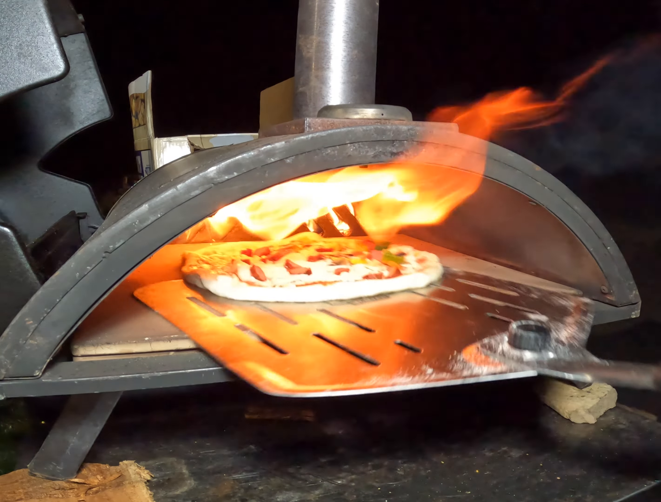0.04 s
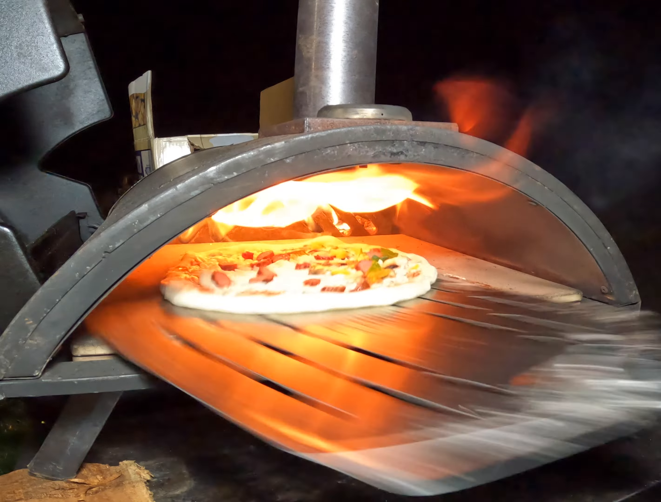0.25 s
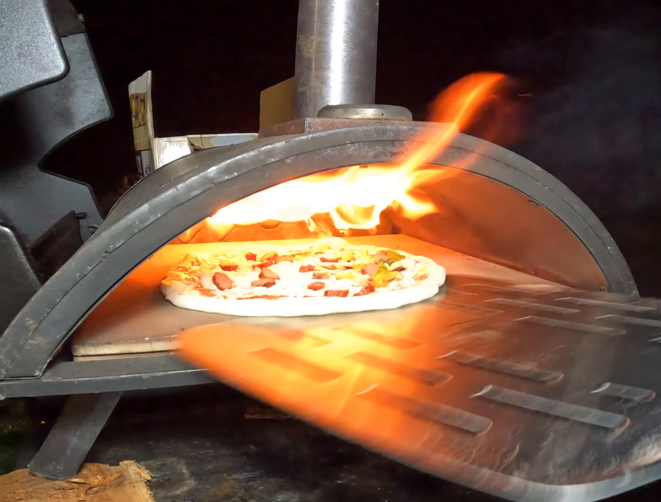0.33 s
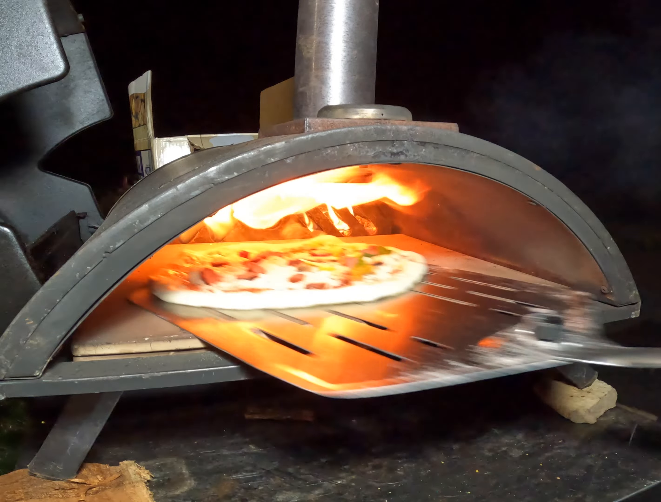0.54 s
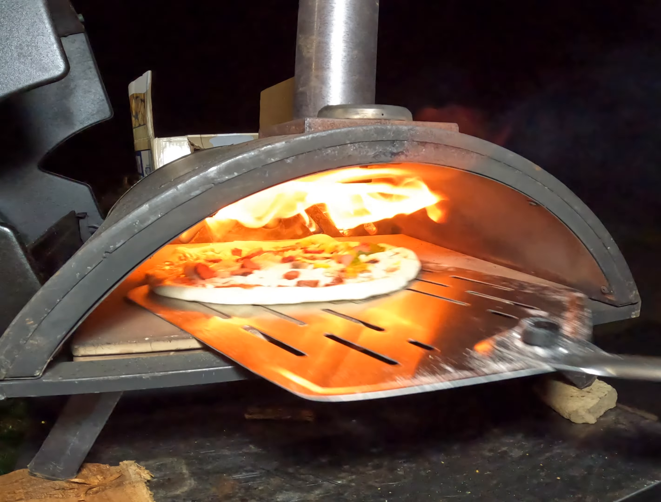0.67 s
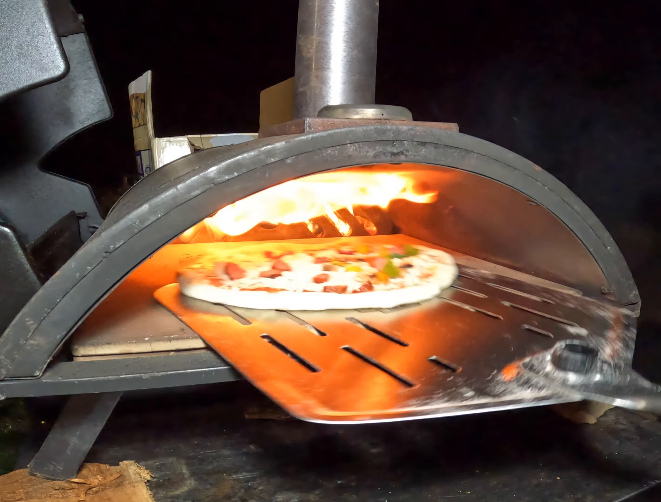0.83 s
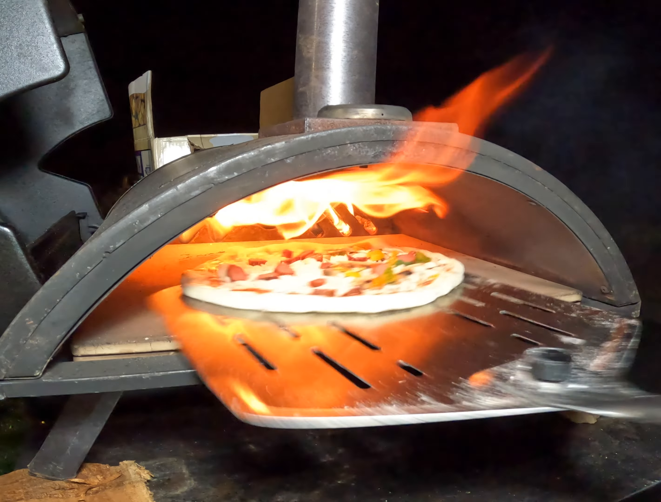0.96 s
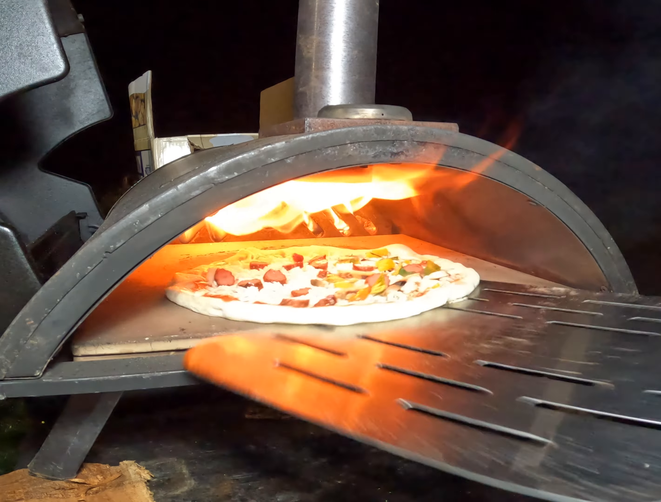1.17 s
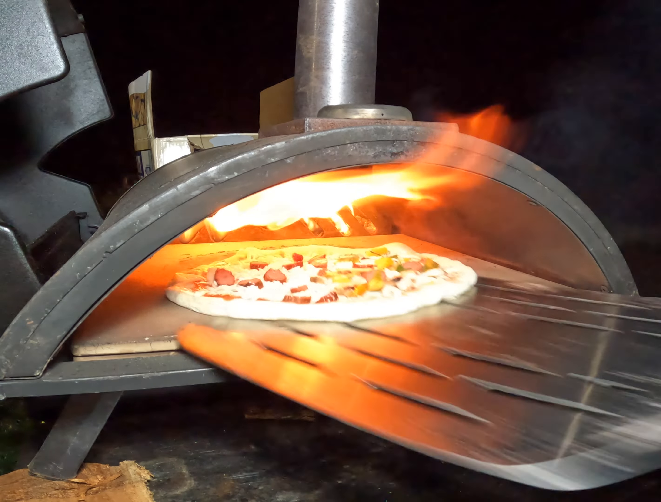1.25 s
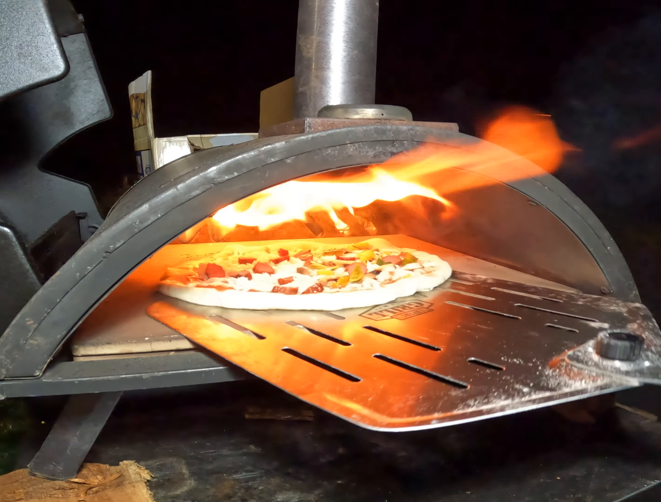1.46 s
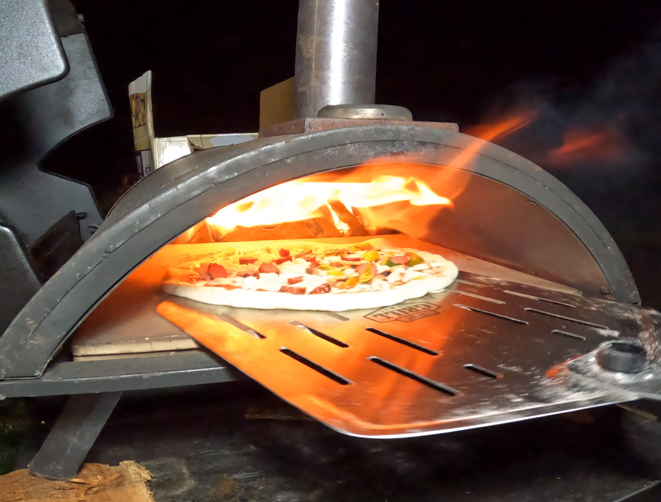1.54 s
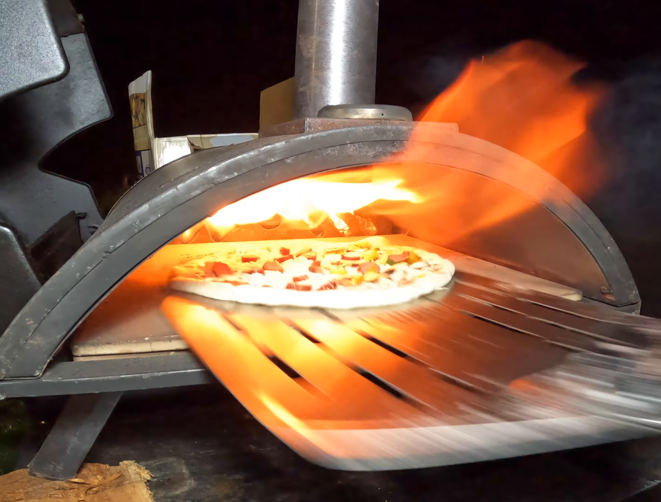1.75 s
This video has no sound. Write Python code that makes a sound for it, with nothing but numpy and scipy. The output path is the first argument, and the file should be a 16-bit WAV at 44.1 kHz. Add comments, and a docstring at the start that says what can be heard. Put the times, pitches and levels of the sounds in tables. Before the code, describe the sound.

A metal peel scrapes gritty stone in a small outdoor oven: a brief slide, two clattering thumps, a loud rasp, a pause, then two more strokes with a sharp clack, close up over soft flame rumble.

```python
"""Flames rumble softly and a hot outdoor oven hisses faintly: two steady beds of coloured noise.
Over them a metal peel rasps across gritty stone in a few strokes: random tiny slips ring blade, plate and oven.
Crumbs crack and the edge clacks, from decaying noise bursts and struck blade modes.
Two thumps ring the body modes of oven and peel and clatter twice each; slips through a narrow
resonance make brief, faint squeaks of the edge."""
import sys
import numpy as np
from scipy import signal
from scipy.fft import rfft, irfft
from scipy.io import wavfile

SR = 44100
rng = np.random.default_rng(int(sys.argv[2]) if len(sys.argv) > 2 else 0)


def dump(signal):
    """Clip the signal to [-1, 1] and save it as 16-bit WAV at the path in sys.argv[1]."""
    limited = np.clip(np.atleast_2d(signal).T, -1, 1)
    pcm = np.round(limited * 32767).astype(np.int16)
    wavfile.write(sys.argv[1], SR, pcm)


N = 79380  # samples, 1.8 s

# beds of flame rumble and oven hiss: f/Hz, relative level/dB per Hz
FLAME_SPECTRUM = [(20, -4.5), (100, -1), (165, -2), (450, -18), (900, -26)]
OVEN_HISS_SPECTRUM = [(400, -9), (1200, 7), (2900, 1), (5000, -2), (9300, -5), (11500, -19), (14500, -25)]
# stereo width: f/Hz, side minus mid/dB
WIDTH = [(60, -19), (1400, -12.5), (5500, -5.5), (9000, -19.5), (11000, -8.5), (13000, 2)]
# blade friction by stretch, before layer trims: t/s, treble level/dB, upper-mid level/dB, mid level/dB
SLIDE_IN = [(0.004, -55, -46, -50.5), (0.15, -50, -50.5, -47), (0.2, -45, -43.5, -43)]
PULL = [(0.285, -49, -46.5, -47), (0.317, -37.5, -35.5, -38), (0.373, -34.5, -32.5, -32.5),
        (0.406, -38, -43.5, -45), (0.44, -30.5, -34.5, -48.5)]
RUN_OUT = [(0.494, -34.5, -29.5, -27.5), (0.569, -42, -37, -37), (0.663, -53.5, -51, -52),
           (0.68, -78, -65, -59)]
SECOND_STROKE = [(0.939, -57, -57, -58), (0.976, -45, -42, -41), (1.014, -53, -50, -47.5),
                 (1.036, -44.5, -44.5, -42.5), (1.125, -32, -33.5, -33), (1.139, -40, -32, -39)]
THIRD_STROKE = [(1.194, -34.5, -34.5, -34), (1.233, -41, -45.5, -53), (1.255, -33, -34, -35),
                (1.336, -34.5, -31.5, -33), (1.44, -49.5, -49.5, -44.5), (1.476, -52, -54, -60),
                (1.49, -79, -84, -51)]
NUDGES = [(1.575, -55, -54.5, -66), (1.645, -60.5, -57.5, -59), (1.672, -42, -40, -45),
          (1.724, -45, -42, -41.5), (1.741, -58, -56, -53), (1.78, -45.5, -41.5, -40.5)]
# hiss of fine grit, scratch of the edge, rasp of the pressed blade: f/Hz, relative level/dB per Hz
HISS_SPECTRUM = [(4800, -14), (6200, -1), (9400, -3), (10500, -10.5), (12400, -10.5), (13300, -18.5),
                 (15500, -17)]
SCRATCH_SPECTRUM = [(1900, -7.5), (2600, 2), (5700, -4), (7000, -46)]
RASP_SPECTRUM = [(500, -7), (720, -3.5), (930, 2), (1300, 4), (2300, -4.5), (3200, -19)]
# blade resonances, before ring trims: f/Hz, rubbed level/dB, struck level/dB
BLADE_MODES = [(961, -11, 1), (1307, -5, -0.5), (1575, -12, -15), (1812, -7, -12), (2130, -5, -16),
               (2380, -22, -6), (2770, -1, -7), (3300, 1, -2.5), (4000, -25, -12), (6450, -19, -22),
               (6866, 1, -1.5)]
# shudder of the oven body under the dragged peel: t/s, level/dB
DRAG_LEVEL = [(0.1, -64), (0.32, -36.5), (0.43, -46), (0.499, -30.5), (0.68, -53.5), (0.92, -60),
              (1.08, -43.5), (1.135, -54), (1.174, -34), (1.3, -57.5), (1.41, -49), (1.65, -63),
              (1.79, -46)]
# colour of that shudder: f/Hz, level/dB
DRAG_COLOUR = [(260, 3), (1200, -3)]
# crumbs cracking under the blade: t/s, level/dB
CRUMB_TIMES = [(0.13, -43), (0.158, -39), (0.657, -38), (0.668, -53)]
# short, dry snap: f/Hz, relative level/dB per Hz, t60/s
SNAP = [(2500, -17, .03), (6950, 13, 0.013), (12000, 6, 0.011), (15100, -18, 0.023)]
# blade edge clacking on the stone: t/s, level/dB, snap relative to it/dB
CLACK_TIMES = [(0.177, -38, 4), (0.7226, -42.5, -24), (0.9629, -40.5, -12), (1.1433, -18.5, -6),
               (1.1754, -33, -18), (1.666, -41, -12)]
# noise of a clack: f/Hz, relative level/dB per Hz, t60/s
CLACK_NOISE = [(250, -8, 0.49), (574, -10.5, 0.5), (960, 3, 0.17), (2500, 4, 0.19), (4200, 3, 0.075),
               (10800, 1, 0.06), (15000, -41, .06)]
# peel thumping on the oven: t/s, body level/dB, contact brightness f/Hz, clatter level/dB, low-thump lag/s
KNOCK_TIMES = [(0.2458, -13.5, 2200, -18, 0.00405), (0.4577, -9, 900, -18, 0.002)]
# low modes of oven and peel together: f/Hz, t60/s, first-knock level/dB, second-knock level/dB
BODY_MODES = [(137, 0.087, -0.5, 0), (177, 0.066, 1.5, 1), (280.3, 0.17, -6.5, -11.5),
              (365.3, 0.13, -10.5, -15.5), (523.7, 0.15, -5, -9), (717.4, 0.14, -19, -15.5),
              (922, 0.2, -12.5, -10.5), (1052, 0.048, 0.5, -24), (1113, 0.13, -13.5, -9),
              (1251, 0.048, -3, -15), (1456, 0.15, -25, -10.5)]
# clatter of a knock: f/Hz, relative level/dB per Hz, t60/s
CLATTER = [(60, -13, 0.68), (175, 5.5, 0.273), (390, -3.5, 0.14), (720, -2.5, 0.11), (1060, -1, 0.15),
           (1820, -4, 0.076), (8000, -15, 0.066), (14800, -48, 0.039)]
# sticking edge: t/s, pitch f/Hz, level/dB, time from peak to 1/e/s
SQUEAK_TIMES = [(0.817, 2712, -54, 0.087), (0.88, 5650, -54.5, 0.024), (0.979, 2160, -37, 0.0047),
                (1.471, 3460, -44.5, 0.006), (1.682, 1800, -39, 0.0083)]
# lead of the left microphone port over the right: f/Hz, phase/rad
PORT_PHASE = [(60, -0.025), (300, -0.5), (3800, -0.49), (7400, 0.17)]

FLAME_DB, OVEN_HISS_DB = -48, -52
HISS_DB, SCRATCH_DB, RASP_DB = 1.5, 0.5, -1.02  # trims added to the friction curves
GRAINS_PER_S, GRAIN_SPREAD_DB = 6500, 2.5
CATCHES_PER_S, CATCH_DB = 90, 7.5 + 20 * np.log10(2)
JUDDER_DB, JUDDER_HZ = 1.33, 69
BLADE_WIDTH_HZ, BLADE_RING_DB, CLACK_RING_DB = 16.3, 1.5, -9.5
PLATE_LOW_HZ, PLATE_HIGH_HZ, PLATE_WIDTH_HZ, PLATE_DB = 1509, 12980, 61, -7.5  # PLATE_DB is before BLADE_RING_DB
PLATE_MODES = 64
WANDER_DB, WANDER_PER_S = 7.5, 34
CAVITY_T60_S, CAVITY_DB = 0.11, -11
DRAG_WIDTH_HZ, SQUEAK_WIDTH_HZ = 69, 200
THUMP_BELOW_HZ = 330
BOUNCE_S, BOUNCE_DB = 0.0115, -9  # delay and level of the second clatter against the first
SKIRT_DB_PER_OCTAVE, CUTOFF_HZ = 24, 16100


def from_db(db):
    """Decibels to gain."""
    return 10 ** (np.asarray(db) / 20)


def rms_one(x):
    """Scale to unit power."""
    return x / np.sqrt(np.mean(x ** 2) + 1e-20)


def at_hz(table, hz, axis=1):
    """Read a column of a table on a log-frequency axis."""
    table = np.array(table)
    return np.interp(np.log(np.maximum(hz, 1)), np.log(table[:, 0]), table[:, axis])


def over_time(s, db):
    """Gain that follows a level curve."""
    return from_db(np.interp(np.arange(N) / SR, s, db))


def coloured(x, spectrum):
    """Give a sustained sound a spectrum that falls away steeply beyond its ends."""
    hz = np.maximum(np.arange(N + 1) * SR / (2 * N), 1)
    octaves_out = np.abs(np.log2(hz / np.clip(hz, spectrum[0][0], spectrum[-1][0])))
    gain = from_db(at_hz(spectrum, hz) - SKIRT_DB_PER_OCTAVE * octaves_out)
    return irfft(rfft(x, 2 * N) * gain)[..., :N]


def drift(rate_hz):
    """Random movement of unit power: noise through two equal one-pole lowpasses."""
    r = np.exp(-2 * np.pi * rate_hz / SR)
    noise = rng.standard_normal(2 * N)
    return rms_one(signal.lfilter([1], [1, -2 * r, r * r], noise)[N:])  # past the filter's start


def clicks(times, db):
    """Single impulses at given times and levels."""
    out = np.zeros(N)
    out[np.clip(np.asarray(times) * SR, 0, N - 1).astype(int)] = from_db(db)
    return out


def stereo(mid, side):
    """Left and right from middle and side."""
    return np.array([mid + side, mid - side])


def spread(source):
    """Two draws of a sustained source, the second as its width."""
    return stereo(source(), coloured(source(), WIDTH))


def ring(x, hz, t60):
    """A struck mode: a decaying sine for each impulse."""
    r, w = from_db(-60 / (t60 * SR)), 2 * np.pi * hz / SR
    return signal.lfilter([0, np.sin(w)], [1, -2 * r * np.cos(w), r * r], x + 1e-18)


def resonance(x, hz, width):
    """A driven resonance with gain 1 on top."""
    r = np.exp(-np.pi * width / SR)
    feed = np.array([1, 0, -1]) * (1 - r * r) / 2
    return signal.lfilter(feed, [1, -2 * r * np.cos(2 * np.pi * hz / SR), r * r], x)


def burst(table, start, db):
    """Many close modes struck at once, as bands of noise each dying at its own rate."""
    t, edges = np.arange(SR // 2) / SR, np.geomspace(45, 16000, 18)
    out, power = 0, 0
    for low, high in zip(edges, edges[1:]):
        hz = np.sqrt(low * high)
        band = signal.butter(2, [low, high], "band", fs=SR, output="sos")
        noise = signal.sosfilt(band, rng.standard_normal((2, len(t))))
        gain = from_db(at_hz(table, hz))
        mid, side = gain * noise * from_db(-60 * t / at_hz(table, hz, axis=2))
        out = out + stereo(mid, side * from_db(at_hz(WIDTH, hz)))
        power += gain ** 2 * (high - low) / (SR / 2)
    levelled = out * from_db(db) / np.sqrt(power)
    return np.pad(levelled, ((0, 0), (int(start * SR), N)))[:, :N]


def fire():
    """Steady low rumble of the flames and faint hiss of the oven, both from shaped noise."""
    rumble = spread(lambda: rms_one(coloured(rng.standard_normal(N), FLAME_SPECTRUM)))
    hiss = spread(lambda: rms_one(coloured(rng.standard_normal(N), OVEN_HISS_SPECTRUM)))
    return from_db(FLAME_DB) * rumble + from_db(OVEN_HISS_DB) * hiss


def grit():
    """Random tiny slips of uneven size, and now and then a harder catch on a coarse grain."""
    sizes = from_db(GRAIN_SPREAD_DB * np.minimum(rng.exponential(1, N), 3)) * rng.choice([-1, 1], N)
    catches = from_db(CATCH_DB) * np.sign(sizes) * (rng.random(N) < CATCHES_PER_S / SR)
    return sizes * (rng.random(N) < GRAINS_PER_S / SR) + catches


def wander():
    """Changing strength with which the moving contact drives one mode."""
    gains = from_db(WANDER_DB * np.clip(rng.standard_normal(200), -2, 2))
    return np.interp(np.arange(N) / SR * WANDER_PER_S, np.arange(len(gains)), gains)


def cavity(x):
    """Dense, short reflections under the oven's dome."""
    t = np.arange(SR // 4) / SR
    tail = rng.standard_normal(len(t)) * from_db(-60 * t / CAVITY_T60_S)
    return x + from_db(CAVITY_DB) * signal.fftconvolve(x, tail / np.linalg.norm(tail))[:N]


def friction(spectrum):
    """Grit catches and lets go thousands of times a second and sets blade and plate ringing."""
    grains = grit()
    places = (np.arange(PLATE_MODES) + rng.random(PLATE_MODES)) / PLATE_MODES
    plate_hz = PLATE_LOW_HZ + places * (PLATE_HIGH_HZ - PLATE_LOW_HZ)
    blade = [(hz, BLADE_WIDTH_HZ, db) for hz, db, _ in BLADE_MODES]
    plate = [(hz, PLATE_WIDTH_HZ, PLATE_DB) for hz in plate_hz]
    rung = sum(from_db(db + BLADE_RING_DB) * resonance(grains * wander(), hz, width)
               for hz, width, db in blade + plate if spectrum[0][0] < hz < spectrum[-1][0])
    return rms_one(coloured(cavity(grains + rung), spectrum))


def shudder():
    """Slips of the same kind drive the low modes of oven and peel."""
    grains = grit()
    shaken = sum((-1) ** k * resonance(grains, hz, DRAG_WIDTH_HZ) for k, (hz, *_) in enumerate(BODY_MODES))
    return rms_one(coloured(shaken, DRAG_COLOUR))


def scrape():
    """Hiss, scratch, rasp and low shudder follow the strokes and judder together."""
    strokes = np.vstack([SLIDE_IN, PULL, RUN_OUT, SECOND_STROKE, THIRD_STROKE, NUDGES])
    s, treble, upper, mids = strokes.T
    hiss = over_time(s, HISS_DB + treble) * spread(lambda: friction(HISS_SPECTRUM))
    scratch = over_time(s, SCRATCH_DB + upper) * spread(lambda: friction(SCRATCH_SPECTRUM))
    rasp = over_time(s, RASP_DB + mids) * spread(lambda: friction(RASP_SPECTRUM))
    drag = over_time(*np.transpose(DRAG_LEVEL)) * spread(shudder)
    return (hiss + scratch + rasp + drag) * from_db(JUDDER_DB * drift(JUDDER_HZ))


def crumbs():
    """Brittle crumbs crack as short, dry bursts of quickly dying treble."""
    return sum(burst(SNAP, s, db) for s, db in CRUMB_TIMES)


def clacks():
    """Hard touches of the edge, which snap and leave the blade modes ringing."""
    times, levels, _ = np.transpose(CLACK_TIMES)
    touches = clicks(times, levels)
    blade_t60 = np.log(1000) / (np.pi * BLADE_WIDTH_HZ)  # a mode's decay follows from its width
    rung = sum((-1) ** k * from_db(db + CLACK_RING_DB) * ring(touches, hz, blade_t60)
               for k, (hz, _, db) in enumerate(BLADE_MODES))
    edge = sum(burst(CLACK_NOISE, s, db) + burst(SNAP, s, db + snap_db) for s, db, snap_db in CLACK_TIMES)
    return rung + edge


def knocks():
    """Each knock rings modes by its place of contact and clatters twice; heavy low modes answer later."""
    out = 0
    for place, (s, body_db, bright_hz, clatter_db, lag_s) in enumerate(KNOCK_TIMES):
        contact = signal.butter(1, min(bright_hz, SR / 4), fs=SR)
        for k, (hz, t60, *db) in enumerate(BODY_MODES):
            push = signal.lfilter(*contact, clicks([s + lag_s * (hz < THUMP_BELOW_HZ)], [body_db]))
            out = out + (-1) ** k * from_db(db[place]) * ring(push, hz, t60)
        out = out + burst(CLATTER, s, clatter_db)
        out = out + burst(CLATTER, s + BOUNCE_S, clatter_db + BOUNCE_DB)
    return out


def squeaks():
    """Short, rough swells of one resonance as the edge sticks and slips."""
    t = np.arange(N) / SR
    out = 0
    for s, hz, db, length in SQUEAK_TIMES:
        swell = np.exp(-((t - s) / length) ** 2)
        out = out + from_db(db) * swell * rms_one(resonance(grit(), hz, SQUEAK_WIDTH_HZ))
    return out


def scene():
    """Fire and peel together."""
    return fire() + scrape() + crumbs() + clacks() + knocks() + squeaks()


def ports(x):
    """The two microphone ports hear the oven slightly out of phase."""
    phase = at_hz(PORT_PHASE, np.arange(N + 1) * SR / (2 * N))
    return irfft(rfft(x, 2 * N) * np.exp(1j * np.array([phase, -phase]) / 2))[:, :N]


def record(dry):
    """Two ports pick up the sound; peaks are rounded and the top is cut."""
    rounded = .8 * np.tanh(ports(dry) / .8)
    return signal.sosfilt(signal.cheby2(12, 70, CUTOFF_HZ, fs=SR, output="sos"), rounded)


dry = scene()
out = record(dry)
dump(out)
```